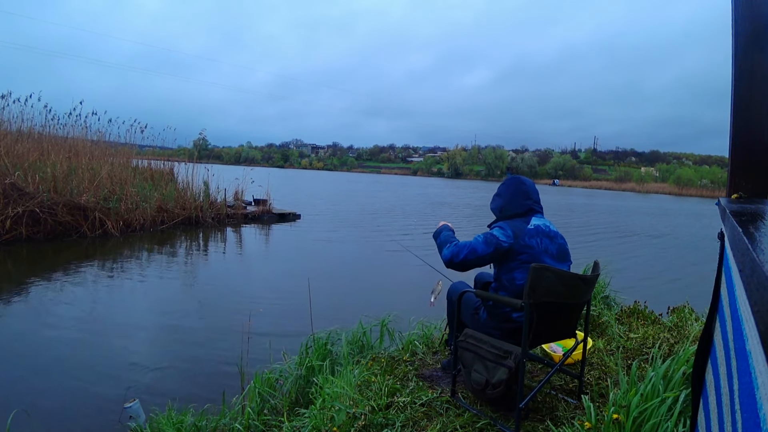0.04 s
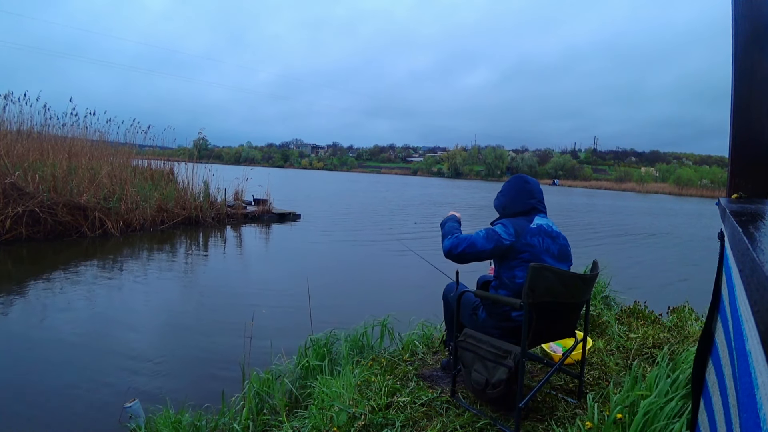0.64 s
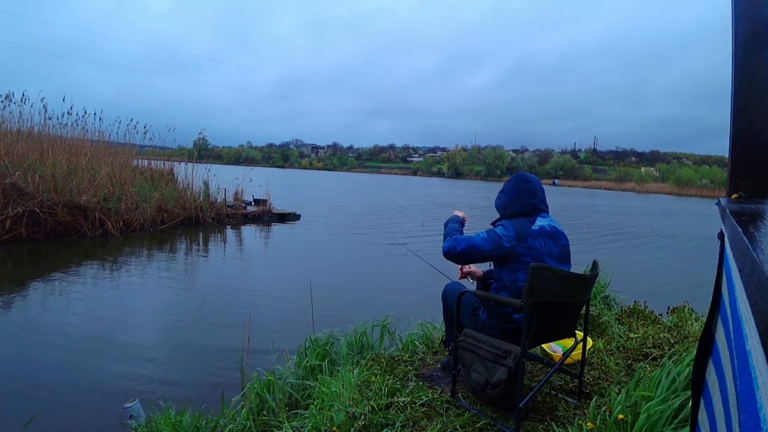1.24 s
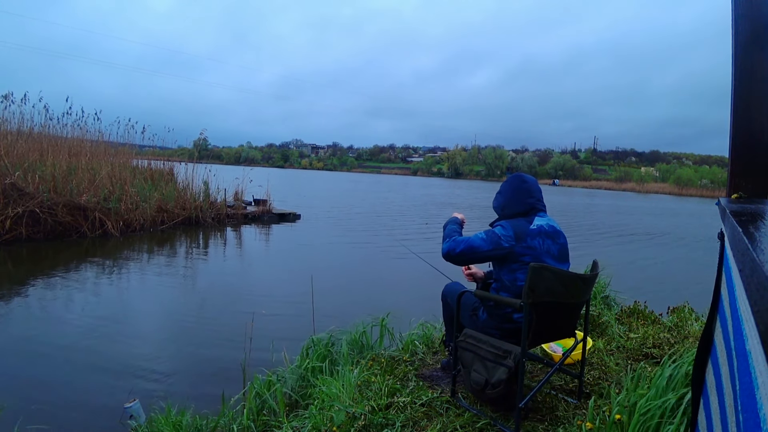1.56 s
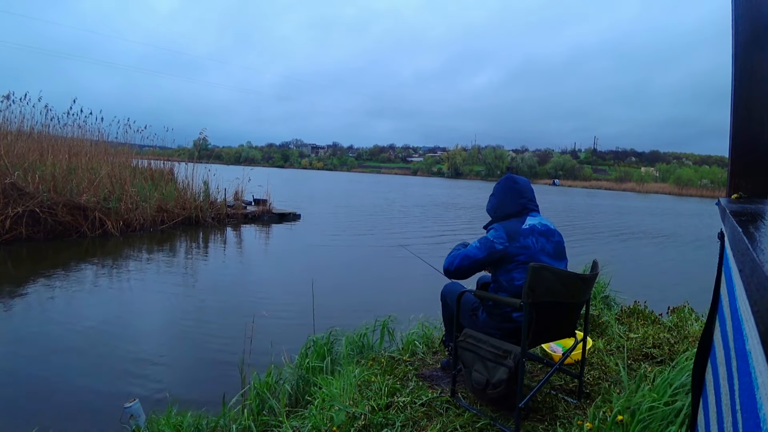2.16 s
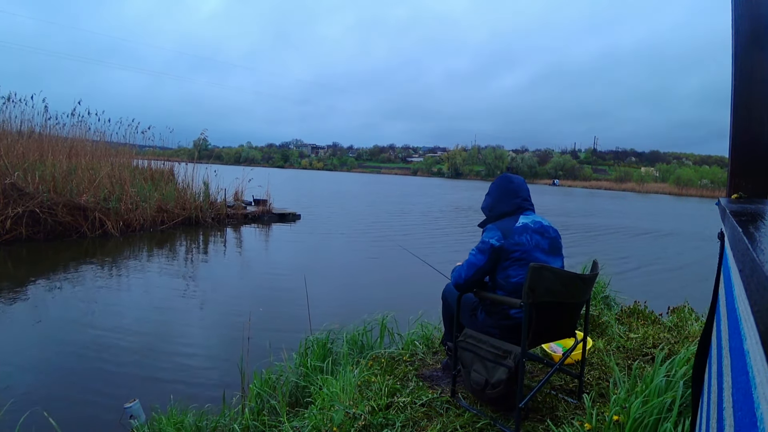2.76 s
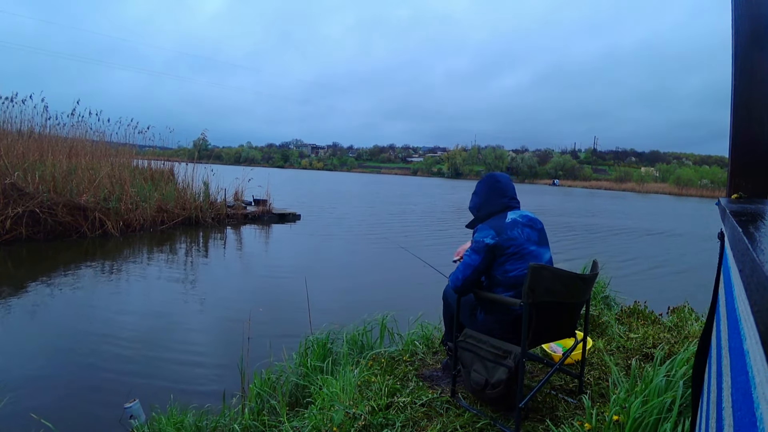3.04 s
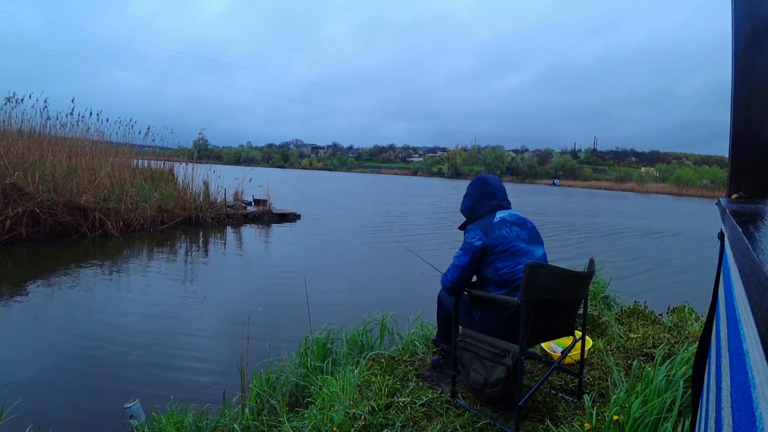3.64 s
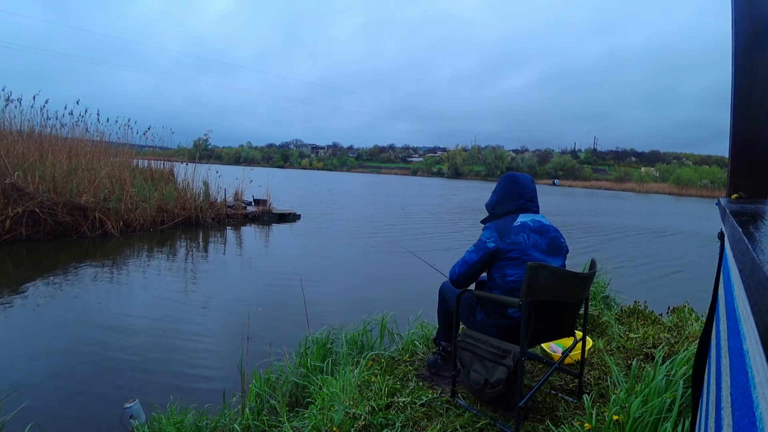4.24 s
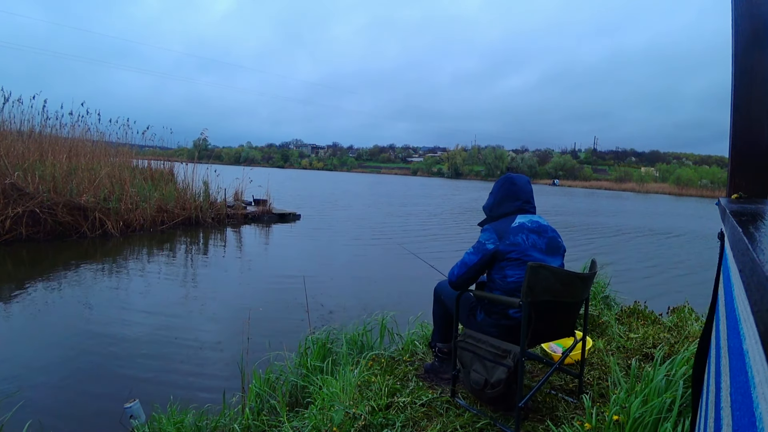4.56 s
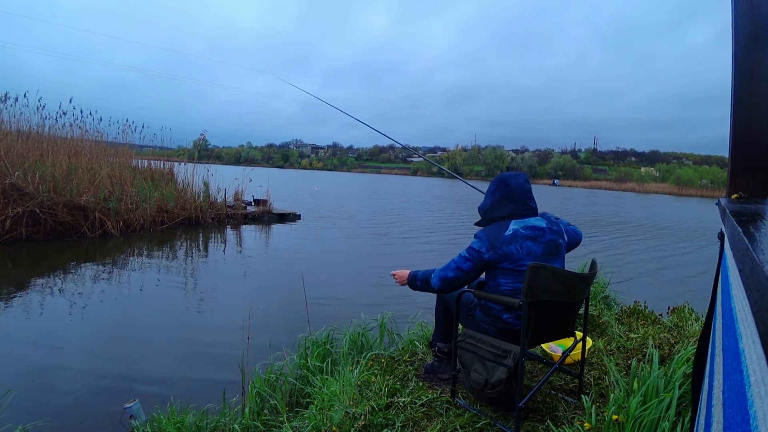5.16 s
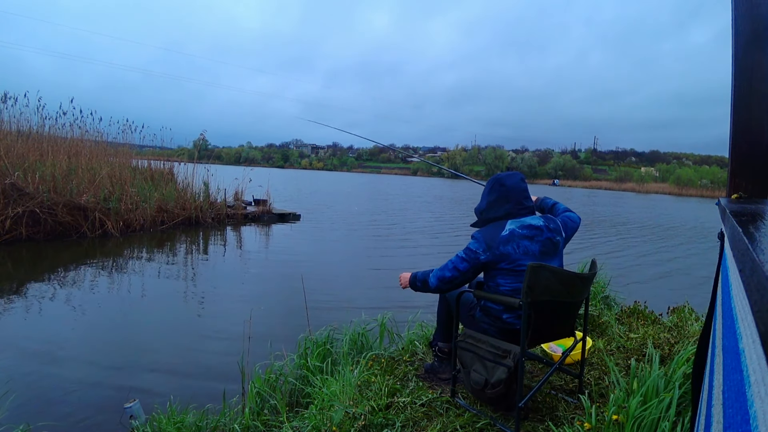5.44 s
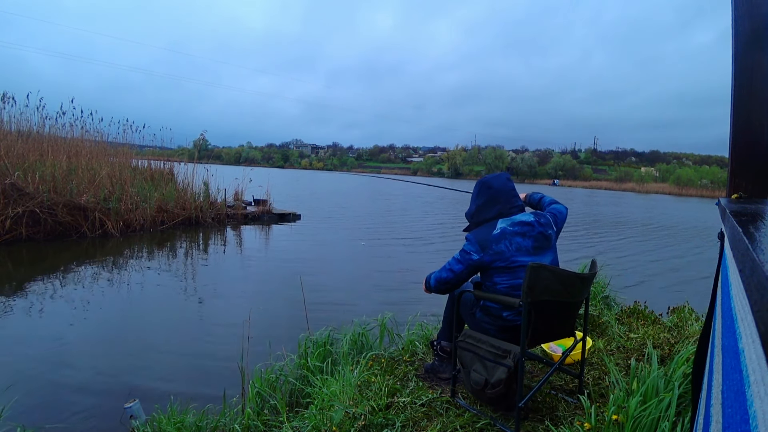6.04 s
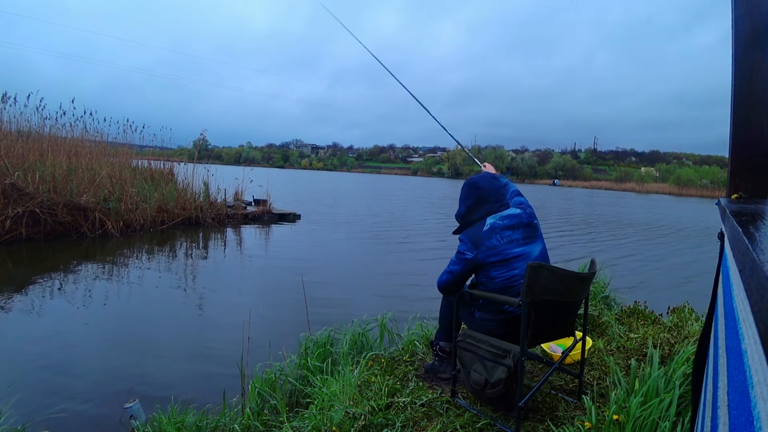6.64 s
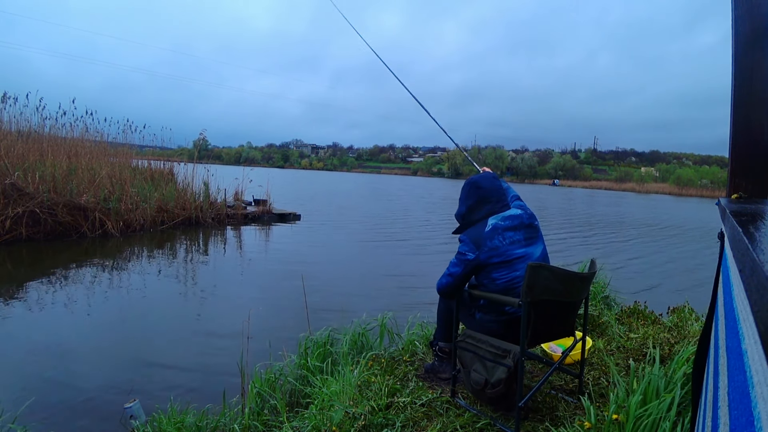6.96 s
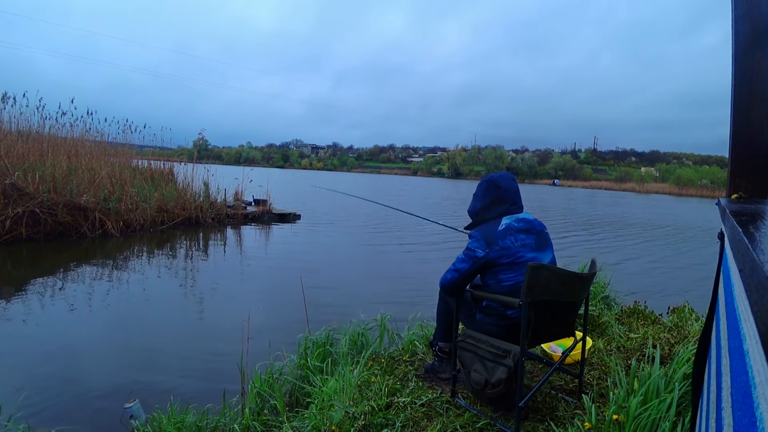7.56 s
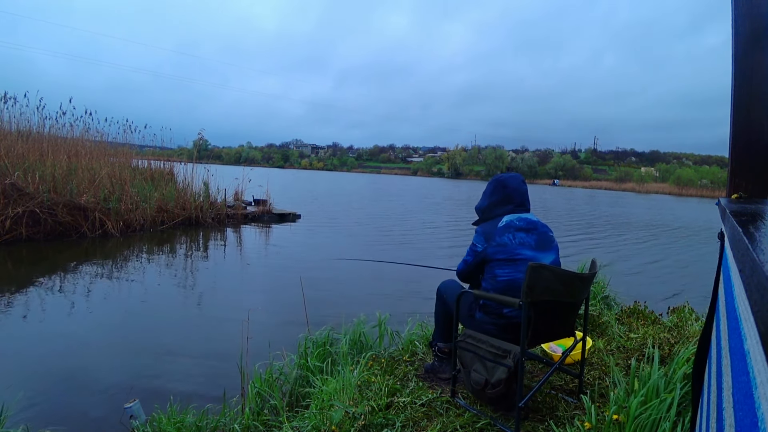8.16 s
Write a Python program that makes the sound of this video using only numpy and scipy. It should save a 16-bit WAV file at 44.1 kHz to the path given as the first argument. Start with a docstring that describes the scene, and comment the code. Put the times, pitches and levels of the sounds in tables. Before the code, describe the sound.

Wind buffets the microphone and cuts off with a click, then something small splashes into water before the gusts return.

```python
"""A grassy river bank on a windy day. First, gusts beat on the microphone's two openings (its ports) and
overload it. At about 2.4 seconds the sound cuts off with a click, then goes on more quietly. Something
small splashes near an angler: slaps throw spray, air bubbles ring and droplets fall back. His nylon
jacket swishes as he lifts the rod, and then the wind comes back. All along, grass hisses, while small
birds call far off and thin whines come and go across the water."""
import sys
import numpy as np
from scipy import signal
from scipy.fft import rfft, irfft, next_fast_len
from scipy.io import wavfile
from scipy.ndimage import uniform_filter1d

SR = 44100
rng = np.random.default_rng(int(sys.argv[2]) if len(sys.argv) > 2 else 0)


def file_out(sig):
    """Save sig as 16-bit WAV at sys.argv[1]."""
    # one column per channel
    cols = np.atleast_2d(sig).T
    # limit, then scale
    lim = np.clip(cols, -1, 1)
    pcm = np.round(lim * 32767).astype(np.int16)
    wavfile.write(sys.argv[1], SR, pcm)


N = 370881
T = np.arange(N) / SR

CUT_S = 2.4296  # the sound cuts off abruptly here, then goes on more quietly
# Wind strength at the ports, before and after that. Each row: time in seconds, level in dB.
FIRST_BLOW = [(0.0, -24.5), (0.29, -34), (0.65, -21.5), (1.65, -31.5), (2.26, -15), (2.42, -21)]
LATER_BREEZE = [(2.5, -43.5), (2.71, -50), (4.1, -56), (4.8, -50), (5.0, -42), (5.61, -38.5), (6.02, -33),
                (6.17, -38.5), (6.35, -32), (7.49, -43), (7.88, -38), (8.08, -26), (8.41, -35)]
BLOW_DB, BREEZE_DB = 3.5, 6.5  # added to those levels
# Tight swirls of air crack against the ports. Each row: time in seconds, peak in dB.
CRACKS = [(.547, -2), (.583, -2), (1.487, -8), (1.503, -12), (1.992, -8), (2.283, -6), (2.303, -0.5),
          (2.335, -9)]

# Bursts of noise. Each row: start in seconds, length in seconds, level in dB.
GUSTS = [(.1, 0.074, -18.5), (.335, 0.0047, -15), (.456, 0.11, -7), (.502, 0.007, -4), (.54, 0.0056, 4),
         (.58, 0.0045, 3), (.61, 0.053, -3), (.679, 0.023, -4), (.742, 0.0099, -10.5), (.864, 0.0275, -5),
         (.906, .006, -6), (.962, 0.03, 4), (1.005, 0.07, 2.5), (1.123, 0.019, -9.5), (1.279, 0.012, -4.5),
         (1.484, 0.0206, 0), (1.547, 0.011, -9), (1.846, 0.022, -11), (1.988, 0.0057, -4.5),
         (2.142, 0.0098, -2.5), (2.18, 0.077, -1.5), (2.229, .076, 2), (2.322, .028, -0.5),
         (2.366, 0.049, -1), (5.59, 0.028, -23.5), (6.2, .1, -24), (7.918, 0.078, -14.5),
         (8.017, 0.034, -10.5), (8.136, 0.061, -13.5), (8.366, 0.04, -18)]  # air hitting the ports
WHOOSHES = [(.8, 1.14, -26), (5.55, 0.84, -54), (5.96, 0.26, -30), (8.02, 0.22, -30.5)]  # air rushing round a post
GRASS_STIRS = [(3.15, 0.35, -55.5), (3.85, 0.58, -53), (6.08, 0.35, -55.5), (8.1, 0.37, -58)]  # grass and reeds rustling up
JACKET_SWISHES = [(.65, 1.44, -62), (3.15, 0.31, -59), (3.95, 0.57, -66), (4.88, 0.22, -58.5),
                  (5.66, 0.062, -62), (6.12, 0.37, -58.5), (7.22, 0.53, -56), (8.02, 0.44, -59.5)]  # the angler moving
TACKLE_TICKS = [(4.46, 0.0017, -50), (4.797, .002, -66), (5.252, .003, -54), (7.875, 0.022, -52),
                (7.912, .004, -52)]  # fishing gear ticking
GEAR_SCRAPES = [(.12, 0.01, -40.5), (.15, 0.047, -43.5)]  # gear being handled

# Slaps on the water. Each row: start in seconds, length in seconds, level in dB, share of fine spray.
SLAPS = [(3.743, 0.017, -34, 0.94), (3.826, 0.01, -37, 0.9), (3.859, .014, -37.5, 0),
         (3.887, 0.012, -38, 0.45), (4, 0.029, -43, 0.6), (4.053, 0.018, -46.5, 0.1),
         (4.068, 0.032, -42, 0.26), (4.13, 0.0088, -39, 0.37), (4.16, 0.023, -44, 0.1),
         (4.174, .022, -38.5, 0.2), (4.239, 0.066, -47, 0.27), (4.344, 0.031, -40.5, 0.5)]
# Big bubbles and falling droplets. Each row: start in seconds, level in dB, starting pitch in Hz.
BIG_BUBBLES = [(3.835, -24, 1240), (3.862, -25.5, 1006), (3.864, -27, 1770), (3.896, -27, 1074),
               (3.9, -35, 1800), (4.013, -30.5, 1136), (4.058, -32.5, 646), (4.086, -31, 897),
               (4.108, -34.5, 465), (4.11, -30, 1410), (4.183, -24, 915), (4.287, -23, 887),
               (4.342, -32, 1025), (4.367, -21, 2040), (4.526, -30.5, 945)]
DROPLETS = [(3.7554, -24, 6540), (3.8108, -20, 5800), (3.8337, -22, 5160), (3.8524, -35, 6950),
            (3.8616, -33, 2130), (3.9519, -39, 4270), (3.9764, -29.5, 6000), (4.0243, -33, 1650),
            (4.0756, -25, 5000), (4.0974, -29, 3640), (4.121, -30, 4970), (4.1395, -28, 1990),
            (4.1639, -33, 1660), (4.1834, -34, 2270), (4.2878, -27, 4700), (4.331, -31, 6310),
            (4.5292, -31.5, 5330)]

# Short bird notes. Each row: start in seconds, starting pitch in Hz, level in dB.
BIRD_CHIPS = [(2.465, 4900, -56), (2.612, 5100, -57), (2.951, 3500, -59), (2.955, 5600, -60),
              (3.097, 5200, -67), (3.195, 5000, -66), (3.3, 5000, -60), (4.79, 4700, -58),
              (6.641, 3700, -52)]
BIRD_WHISTLES = [(.32, 4150, -61), (2.62, 3600, -65), (3.461, 3320, -64), (5.14, 3930, -60),
                 (5.328, 4690, -62), (5.59, 3890, -56.5), (5.6, 4370, -66), (5.77, 4660, -63),
                 (5.86, 3230, -63.5), (6.54, 4580, -61), (6.74, 4330, -65), (6.941, 3270, -63.5),
                 (7.88, 4130, -64)]
# Sliding tones. Each row: start and length in seconds, first and last pitch in Hz, level in dB.
BIRD_SLURS = [(2.88, 0.12, 7480, 5700, -62)]
FAR_WHINES = [(1.2, 2.7, 934, 928, -64.5, 6), (4.7, 3.65, 930, 932, -64, 6),
              (3.22, .25, 1140, 1115, -55, 14), (5.5, 1.6, 1490, 1390, -62.5, 34),
              (5.5, 1.6, 2120, 1940, -68, 45)]  # each row ends with one more number: pitch wobble in Hz

# A colour says how strong a noise is from low to high. Each row: frequency in Hz, relative level in dB.
PORT_COLOUR = [(25, 1), (60, 0.5), (100, -3), (200, -0.5), (350, 0.5), (520, 3), (750, -15.5), (1200, -51),
               (2500, -44), (5000, -43)]
CRACKLE_COLOUR = [(700, 9), (1500, 3.5), (2500, -5.5), (5000, -31.5), (10000, -35), (16000, -39)]
WHOOSH_COLOUR = [(120, 8), (250, 0.5), (370, 3), (520, -0.5), (650, -12.5), (850, -48), (1500, -56)]
COARSE_SPRAY_COLOUR = [(500, -4), (900, 10), (1300, 4), (1950, 12), (2700, 3.5), (4000, 3.5), (7000, -7),
                       (15000, -44)]
FINE_SPRAY_COLOUR = [(1000, 0), (2000, -21), (3500, -1), (5500, 5.5), (7500, 4), (10000, -5), (15000, -19)]
GRASS_COLOUR = [(700, 16.5), (1500, 2.5), (3500, 6.5), (6000, 3.5), (9000, -4.5), (15000, -10.5)]
JACKET_COLOUR = [(3000, -5.5), (5200, -8), (6400, -4), (7600, -1.5), (9000, -7), (11500, -12), (16000, -32)]
SCRAPE_COLOUR = [(900, 5.5), (1500, 0), (2500, -4), (3700, -2), (4600, -22), (9000, -24)]
AIR_COLOUR = [(59, -14), (100, -10), (153, -11), (189, -13.5), (328, -12), (381, -10), (595, -12.5),
              (752, -10), (2220, -22), (3250, -27.5), (3860, -29), (6560, -48.5), (8830, -38),
              (16000, -36.5)]
# How alike left and right are. Each row: frequency in Hz, likeness (1 the same, -1 opposite).
PORT_LIKENESS = [(25, 1), (70, 0.81), (130, 0.17), (220, -0.65), (400, -0.87), (1000, -0.77), (5000, -1.1)]  # for wind on the ports
AIR_LIKENESS = [(100, 1), (290, 0.46), (640, -0.5), (1400, -0.38), (3100, -0.042), (6800, 0.65),
                (15000, 0.46)]  # for sound that comes through the air


def wind():
    """A wavering flow and sudden gusts press on the ports, with a rumble, a whoosh and a crackle."""
    flow_db = np.where(T < CUT_S, in_time(FIRST_BLOW) + BLOW_DB, in_time(LATER_BREEZE) + BREEZE_DB)
    flow = from_db(flow_db + 4 * drift(33.4))
    gusts = from_db(-1 + 2.5 * drift(82)) * bursts(GUSTS, rise_s=0.0057, fall_s=0.0034)
    rumble = port_rumble(strength=np.hypot(flow, gusts))
    return rumble + whoosh() + overload_crackle(rumble)


def port_rumble(strength, top_at_0db_hz=398, lull_top_hz=67, doubling_db=14.5):
    """Harder wind makes smaller swirls of air, so the rumble reaches higher as it gets louder."""
    top_hz = np.maximum(top_at_0db_hz * 2 ** (20 * np.log10(strength) / doubling_db), lull_top_hz)
    edges_hz = 18 * 2 ** np.arange(0, 8.1, .5)
    white = rng.standard_normal((2, 2, N))
    swirls, power = 0, 0
    for k, (low, high) in enumerate(zip(edges_hz, edges_hz[1:])):
        hz = np.sqrt(low * high)
        band = signal.butter(2, [low, high], "band", fs=SR, output="sos")
        mid, side = signal.sosfilt(band, white[k % 2])
        # bands fade steeply above the top, and gently far below it
        fade = (1 + (hz / top_hz) ** 5.73) * (1 + (0.25 * top_hz / hz) ** 2)
        share = from_db(at_hz(PORT_COLOUR, hz)) ** 2 / fade
        swirls += np.sqrt(share) * stereo(mid, side, at_hz(PORT_LIKENESS, hz))
        power += share * (high - low) / (SR / 2)
    swirls /= np.sqrt(power)
    # each swirl carries about the pressure of the gust that brings it
    swell = np.sqrt(uniform_filter1d(np.mean(swirls ** 2, axis=0), size=900) + 0.56)
    return strength * swirls / swell


def overload_crackle(rumble, limit_db=0.5):
    """The overloaded microphone crackles at the loudest peaks."""
    excess = np.maximum(np.abs(rumble).max(axis=0) - from_db(limit_db), 0)
    return from_db(-22) * np.tanh(2 * excess) * noise(CRACKLE_COLOUR, PORT_LIKENESS)


def whoosh():
    """Air rushes round the post by the microphone as the wind swells."""
    swell = bursts(WHOOSHES, rise_s=0.068, fall_s=0.096) * from_db(-1 + 3.5 * drift(10.2))
    return swell * noise(WHOOSH_COLOUR, PORT_LIKENESS)


def wind_cracks(crack_s=0.00018):
    """Each tight swirl gives the ports one quick pull and push."""
    out = np.zeros((2, N))
    u = np.arange(-40, 41) / SR / crack_s
    crack = u * np.exp((1 - u ** 2) / 2)
    for start, level_db in CRACKS:
        add(out, start - 40 / SR, from_db(level_db) * crack)
    return out


def cut_click(build_s=0.0038):
    """A click, louder on the right, where the sound cuts off abruptly."""
    click = -np.exp(-np.abs(T - CUT_S) / build_s) * (T < CUT_S)
    return from_db([[-20], [-6]]) * click


def splash():
    """Slaps throw crackling spray and tiny bubbles; big bubbles gulp and droplets ping."""
    coarse_rows = [(s, length, db + share_db(1 - share)) for s, length, db, share in SLAPS]
    fine_rows = [(s, length, db + share_db(share)) for s, length, db, share in SLAPS]
    coarse = bursts(coarse_rows, rise_s=0.00061, fall_s=0.012)
    fine = bursts(fine_rows, rise_s=0.000694, fall_s=0.017)
    spray = coarse * noise(COARSE_SPRAY_COLOUR, AIR_LIKENESS, grain_db=2.5)
    spray += fine * noise(FINE_SPRAY_COLOUR, AIR_LIKENESS, grain_db=5.5)
    out = from_db(2 * drift(140)) * spray + fizz(thrown=np.hypot(coarse, fine))
    for start, level_db, hz in BIG_BUBBLES:
        add(out, start, from_db(level_db - 5) * bubble(hz, ring_s=80 / hz, climb=20, attack_s=0.00055))
    for start, level_db, hz in DROPLETS:
        add(out, start, from_db(level_db - 1) * bubble(hz, ring_s=0.012, climb=3.4, attack_s=0.00013))
    return out


def fizz(thrown, count=330):
    """Thrown water lands as a patter of tiny bubbles: more water, more and louder pings."""
    out = np.zeros((2, N))
    births = rng.choice(N, count, p=thrown ** .4 / np.sum(thrown ** .4))
    for i, (pitch, loudness, flight) in zip(births, rng.random((count, 3))):
        hz = 1100 * (7500 / 1100) ** (pitch ** .8)
        ping = bubble(hz, ring_s=22 / hz, climb=10, attack_s=0.00048)
        # most drops are faint and land at once, a few are loud or fly longer
        add(out, i / SR + .035 * flight ** 3, thrown[i] * from_db(15 * loudness ** 3 - 1) * ping)
    return out


def bubble(hz, ring_s, climb, attack_s):
    """A pocket of air rings and dies away, its pitch climbing ever faster as it nears the surface."""
    t = np.arange(int(ring_s * SR)) / SR
    phase = 2 * np.pi * hz * np.expm1(climb * t) / climb
    # the two ports hear the wave out of step
    apart = np.arccos(np.clip(at_hz(AIR_LIKENESS, hz), -1, 1)) * np.array([[.5], [-.5]])
    return np.sin(phase + apart) * from_db(-60 * t / ring_s) * (1 - np.exp(-t / attack_s))


def grass(early_db=-54, later_db=-58.5):
    """Grass and reeds hiss in the wind, more softly after the click, and rustle up when stirred."""
    hiss = from_db(np.where(T < CUT_S, early_db, later_db))
    stirs = bursts(GRASS_STIRS, rise_s=0.12, fall_s=0.06)
    loudness = np.hypot(hiss, stirs) * from_db(0.21 * drift(25))
    return loudness * noise(GRASS_COLOUR, AIR_LIKENESS, grain_db=3.5)


def angler(fidget_db=-66.5):
    """Nylon rubs on nylon as he moves, and never quite rests; his gear scrapes and ticks."""
    swishes = bursts(JACKET_SWISHES, rise_s=0.12, fall_s=0.076)
    rubbing = np.hypot(from_db(fidget_db), swishes) * from_db(1 + 1.8 * drift(23))
    ticks = bursts(TACKLE_TICKS, rise_s=0.00043, fall_s=0.00098)
    scrapes = bursts(GEAR_SCRAPES, rise_s=0.0022, fall_s=0.0073)
    dull = noise(SCRAPE_COLOUR, AIR_LIKENESS, grain_db=4.5)
    bright = noise(JACKET_COLOUR, AIR_LIKENESS, grain_db=2)
    return scrapes * dull + (rubbing + ticks) * bright


def birds(chip_s=0.025, whistle_s=0.084, chip_fall=0.212, whistle_fall=0.0156):
    """Small birds give falling chips, nearly level whistles, a high slur and faint random twitter."""
    waver = 0.014 * drift(150)
    notes = [(s, chip_s, hz, hz * (1 - chip_fall), db) for s, hz, db in BIRD_CHIPS]
    notes += [(s, whistle_s, hz, hz * (1 - whistle_fall), db) for s, hz, db in BIRD_WHISTLES]
    notes += BIRD_SLURS
    for when, pitch, length, bend in rng.random((22, 4)):  # the twitter
        hz = 3200 + 1500 * pitch
        to_hz = hz * (1 + chip_fall * (bend - .5))
        notes.append((when * (T[-1] - .5), chip_s + length * whistle_s, hz, to_hz, -65))
    out = np.zeros(N)
    for start, length, from_hz, to_hz, level_db in notes:
        add(out, start, from_db(level_db) * glide(length, from_hz, to_hz, waver[int(start * SR):]))
    return out


def whines(fading_db=2.6):
    """Thin tones from across the water; moving air makes them fade in and out."""
    out = np.zeros(N)
    for start, length, from_hz, to_hz, level_db, wobble_hz in FAR_WHINES:
        tone = glide(length, from_hz, to_hz, waver=wobble_hz / from_hz * drift(wobble_hz))
        add(out, start, from_db(level_db + fading_db * drift(2.7)[:len(tone)]) * tone)
    return out


def shore_echo(sound, direct_db=-1.5, echo_db=-2, ring_s=0.27):
    """Far sounds blur as they scatter off the reeds and the far shore."""
    t = T[:SR // 2]
    scatter = rng.standard_normal((2, len(t))) * from_db(-60 * t / ring_s)
    scatter /= np.sqrt(np.sum(scatter ** 2, axis=1, keepdims=True))
    echo = signal.fftconvolve(sound[None], scatter, axes=1)[:, :N]
    return from_db(direct_db) * sound + from_db(echo_db) * echo


def open_air(level_db=-48.5):
    """The soft, steady hush of the outdoors."""
    return from_db(level_db) * noise(AIR_COLOUR, AIR_LIKENESS)


def glide(length, from_hz, to_hz, waver):
    """A tone that slides in pitch while it swells and fades."""
    progress = np.linspace(0, 1, int(length * SR))
    hz = (from_hz + (to_hz - from_hz) * progress) * (1 + waver[:len(progress)])
    return np.sqrt(2 * np.abs(np.sin(np.pi * progress))) * np.cos(2 * np.pi * np.cumsum(hz) / SR)


def noise(colour, likeness, grain_db=0):
    """Stereo noise of a given colour; grain_db makes it crackle."""
    grains = from_db(grain_db * np.minimum(rng.exponential(1, N), 6))
    white = rng.standard_normal((2, N)) * grains
    size = next_fast_len(N)
    hz = np.maximum(np.fft.rfftfreq(size, 1 / SR), 1)
    bass_cut = 1 / (1 + (colour[0][0] / hz / 2) ** 2)
    mid, side = rfft(white, size) * from_db(at_hz(colour, hz)) * bass_cut
    return rms_one(irfft(stereo(mid, side, at_hz(likeness, hz)), size)[:, :N])


def bursts(rows, rise_s, fall_s):
    """A loudness curve of bursts that swell, hold and die away; their powers add."""
    power = np.zeros(N)
    for start, length, level_db in rows:
        near = slice(max(int((start - 10 * rise_s) * SR), 0), int((start + length + 10 * fall_s) * SR))
        early, late = np.maximum(start - T[near], 0), np.maximum(T[near] - start - length, 0)
        power[near] += (from_db(level_db) * np.exp(-early / rise_s - late / fall_s)) ** 2
    return np.sqrt(power)


def drift(rate_hz):
    """A smooth random wander, about 1 in size; a higher rate wanders faster."""
    step = 40  # samples between random points
    r = np.exp(-2 * np.pi * step * rate_hz / SR)
    slow = signal.lfilter([1], [1, -2 * r, r * r], rng.standard_normal(N // step + 2002))[2000:]
    return np.interp(np.arange(N) / step, np.arange(len(slow)), rms_one(slow))


def stereo(mid, side, likeness):
    """Left and right share mid and get side with opposite signs."""
    alike = np.clip(likeness, -.98, .98)
    return (np.sqrt(1 + alike) * mid + np.sqrt(1 - alike) * side * np.array([[1], [-1]])) / np.sqrt(2)


def add(out, start, sound):
    """Mix a sound in at its start time in seconds."""
    i = int(start * SR)
    out[..., i:i + sound.shape[-1]] += sound[..., :N - i]


def in_time(rows):
    """Join (time, value) rows into a curve with a value at every sample."""
    return np.interp(T, *np.transpose(rows))


def at_hz(rows, hz):
    """Read between (frequency, value) rows, with octaves evenly spaced."""
    rows = np.array(rows)
    return np.interp(np.log(hz), np.log(rows[:, 0]), rows[:, 1])


def from_db(db):
    """Turn decibels into a number to multiply by."""
    return 10 ** (np.asarray(db) / 20)


def share_db(share):
    """Turn a share of the power (at least 0.02) into decibels."""
    return 10 * np.log10(max(share, .02))


def rms_one(x):
    """Scale a signal to an average power of 1."""
    return x / np.sqrt(np.mean(x ** 2) + 1e-20)


def scene():
    """All the sounds added together, left and right."""
    air = open_air()
    near = wind() + wind_cracks() + cut_click() + splash() + grass() + angler()
    return near + shore_echo(birds() + whines()) + air


def record(dry, cutoff_hz=15900):
    """The loudest gusts overload and are clipped flat; then the highest treble is cut."""
    treble_cut = signal.ellip(10, .1, 70, cutoff_hz, fs=SR, output="sos")
    return signal.sosfilt(treble_cut, np.clip(dry, -1, 1))


dry = scene()
out = record(dry)
file_out(out)
```